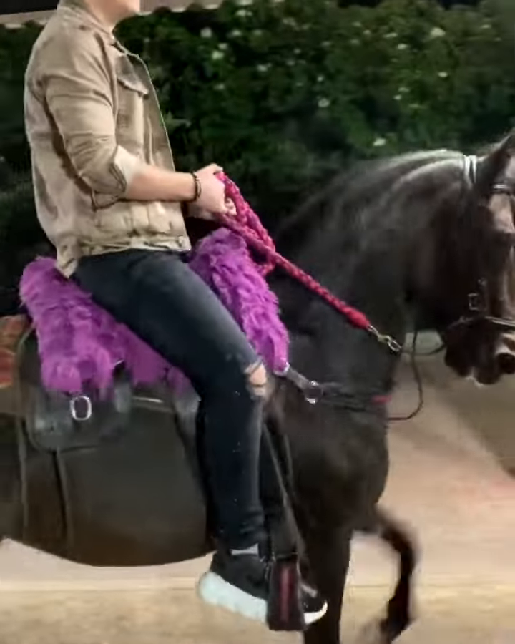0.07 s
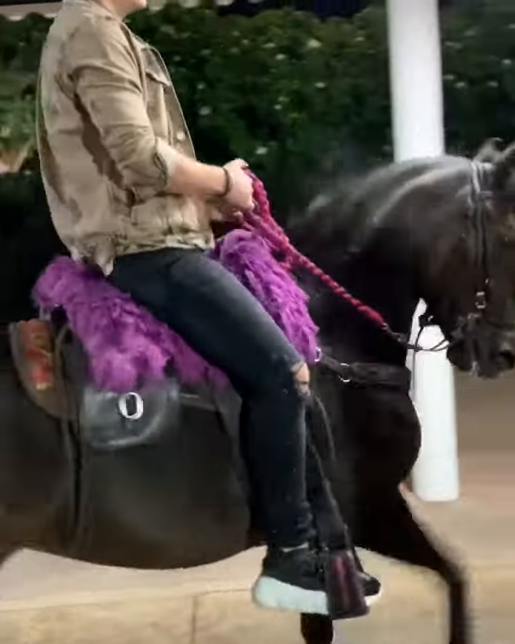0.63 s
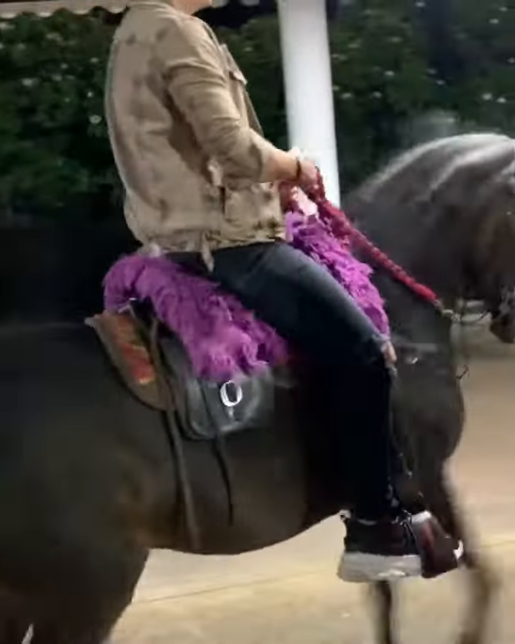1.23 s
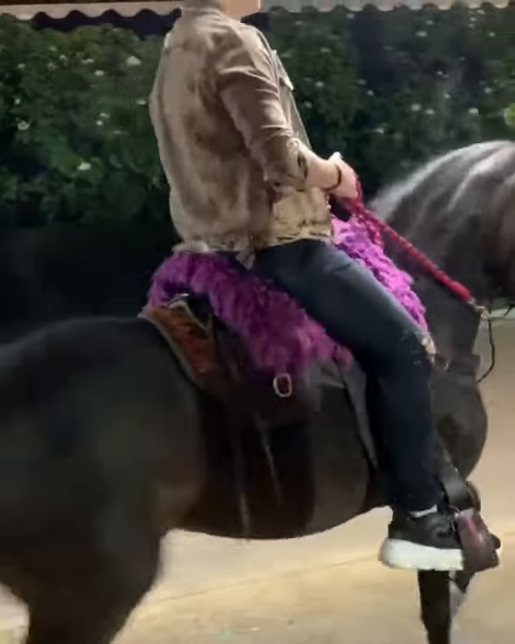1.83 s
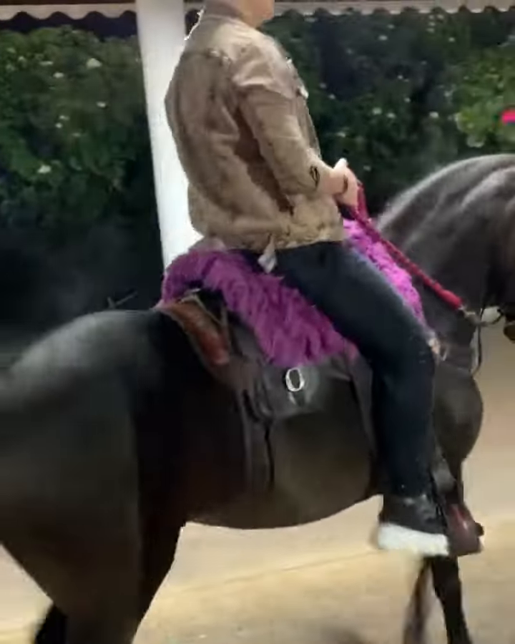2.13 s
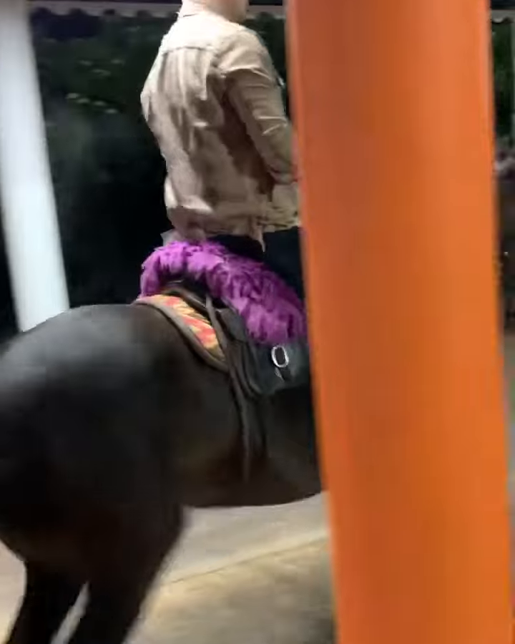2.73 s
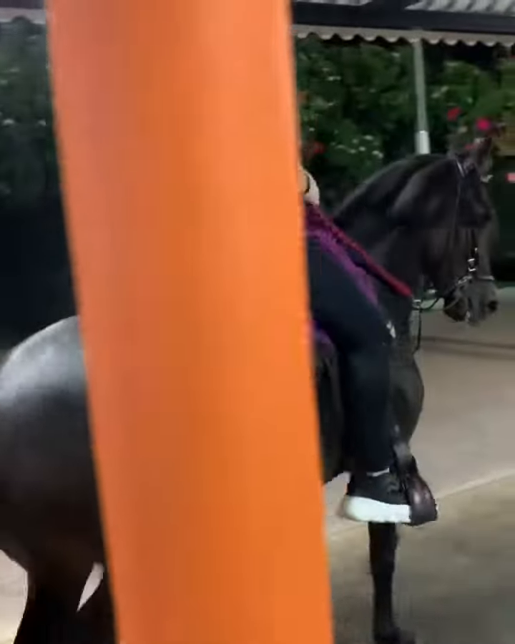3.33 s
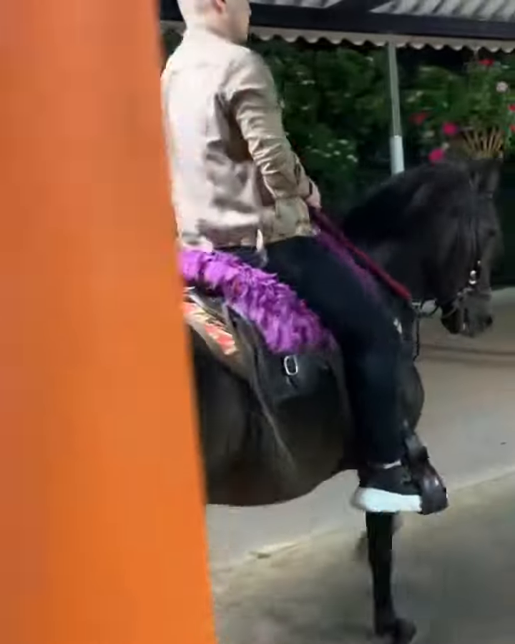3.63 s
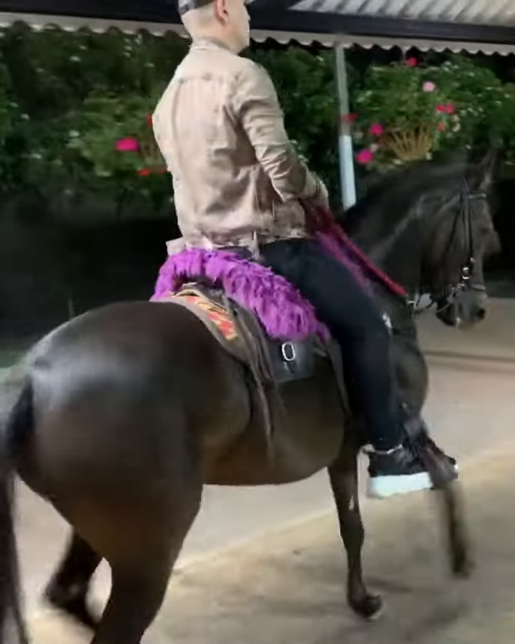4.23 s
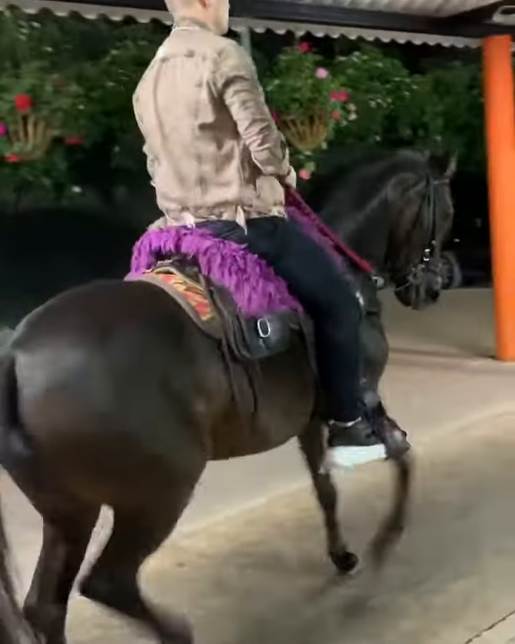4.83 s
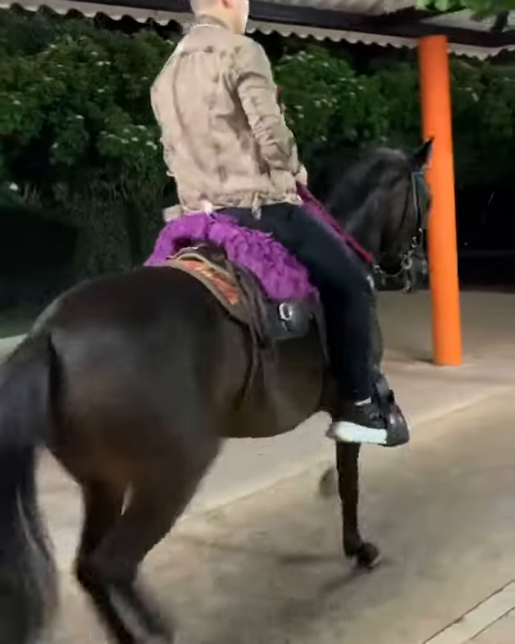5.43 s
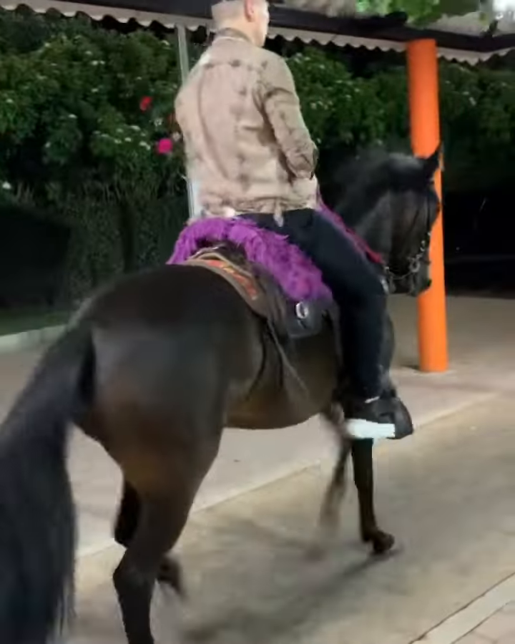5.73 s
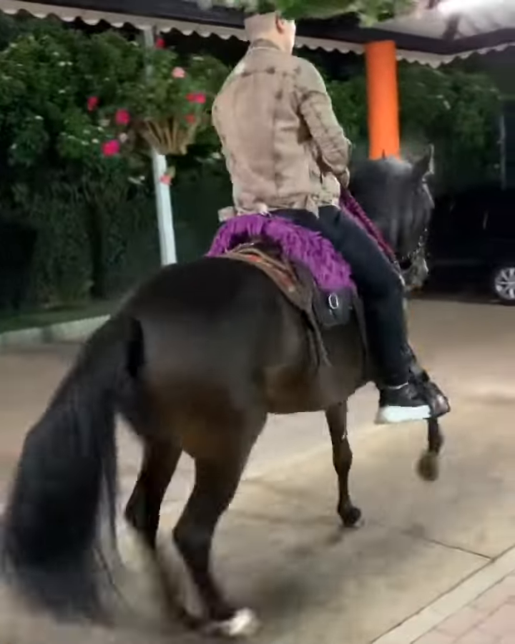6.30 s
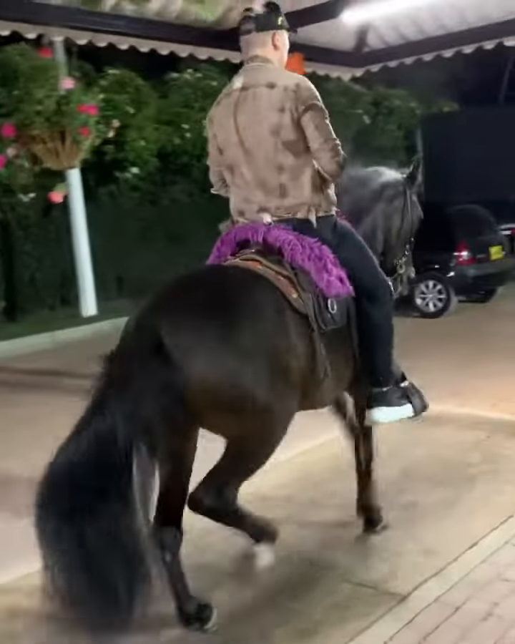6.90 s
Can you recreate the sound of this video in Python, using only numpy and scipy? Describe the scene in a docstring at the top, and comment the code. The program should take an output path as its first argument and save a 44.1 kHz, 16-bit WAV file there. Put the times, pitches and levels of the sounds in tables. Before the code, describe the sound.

Quick, even hoofbeats of a horse clop and clink on stone close by, with faint low night ambience behind.

```python
"""A paved place under a roof, at night: a horse walks past a close-set stereo microphone in quick short steps.
Fore hooves land flat, hind hooves heel then toe: a tick and click of steel on stone, a hollow clop,
then a thud as the weight comes down. Shoes clink, grit and stone chips crunch, one hoof scrapes,
and the roof answers. Behind it all lie a low rumble, a swelling drone and faint night air."""
import sys
import numpy as np
from scipy import signal
from scipy.fft import rfft, irfft, next_fast_len
from scipy.io import wavfile
from scipy.ndimage import map_coordinates

SR = 44100
rng = np.random.default_rng(int(sys.argv[2]) if len(sys.argv) > 2 else 0)


def wrap_up_sound(samples):
    """Save the sound to the file named by the first command line argument, as 16-bit audio."""
    columns = np.atleast_2d(samples).T
    # keep every value between -1 and 1, then stretch to whole-number steps
    tamed = np.clip(columns, -1, 1)
    steps = np.round(tamed * 32767).astype(np.int16)
    wavfile.write(sys.argv[1], SR, steps)


N = 306936
TIME = np.arange(N) / SR

# Spectra of a hoof on paving, brightest part first: f/Hz, level/dB
TICK_SPECTRUM = [(3500, 6.5), (5100, 8), (6500, 0), (8200, 0), (9800, -5), (11200, -11), (12200, -45)]
CLICK_SPECTRUM = [(1200, 25), (2000, 7), (2600, 12.5), (4100, 1.5), (4900, 4.5), (7000, 7)]
CLOP_SPECTRUM = [(250, -13), (480, -3.5), (650, 6), (1000, -3.5), (1400, -2), (2100, -2.5), (3200, -92)]
THUD_SPECTRUM = [(60, -15), (110, 3.5), (160, 0.5), (330, -2.5), (420, -1.5), (520, -11), (900, -5)]
WEIGHT_SPECTRUM = [(45, -14.5), (80, -12.5), (115, 0.5), (170, 5), (240, -9), (350, -2.5), (520, -59)]
def hooves():
    """All steps, as a sharp part (shoe and horn on stone) and a dull part (weight on the ground)."""
    every_contact = np.hstack([fore_contacts(), hind_contacts(), clink_contacts()])
    s, contact_s, thud_db, thud_hz, clop_db, hollow_db, clop_hz, click_db, shoe_hz, tick_db = every_contact
    tick_db = tick_db + 1.2 * rng.standard_normal(len(s)) + 2.5
    steel_db = click_db - 1.5
    tick = strikes(s, tick_db, TICK_SPECTRUM, contact_s, rough=2.35, lag_cycles=.056)
    click = strikes(s, steel_db, CLICK_SPECTRUM, contact_s, rough=.8, lag_cycles=.3773,
                    ring_hz=shoe_hz, q=.88)
    # the steel shoe and the cupped sole ring for a few milliseconds before the hoof damps them
    shoe = strikes(s, steel_db, CLICK_SPECTRUM, contact_s, rough=.8, lag_cycles=.404,
                   ring_hz=shoe_hz, q=11)
    hollow = strikes(s, hollow_db, CLOP_SPECTRUM, contact_s, rough=.45, lag_cycles=1.4,
                     ring_hz=clop_hz, q=7.9)
    clop = strikes(s, clop_db, CLOP_SPECTRUM, contact_s, rough=1, lag_cycles=.7043,
                   ring_hz=clop_hz, q=1.75)
    # one clean low knock, then the body's weight settles, varying less from step to step
    thud = strikes(s, thud_db - 2, THUD_SPECTRUM, crush_s=.015, rough=.4, lag_cycles=1.35,
                   ring_hz=thud_hz, q=2.44, size=4096)
    weight_db = .62 * thud_db - 7
    weight = strikes(s, weight_db, WEIGHT_SPECTRUM, crush_s=.032, rough=4.1, lag_cycles=.8056, size=6144)
    return tick + click + shoe + clop + hollow, thud + weight


# Fore footfalls: t/s, thud level/dB, thud f/Hz, clop level/dB, hollow ring level/dB, clop f/Hz,
# click level/dB, shoe f/Hz
FORE_FOOTFALLS = [(0.0633, -6.5, 185, -18.5, -27, 785, -27.5, 2340),
                  (0.238, -13.5, 227, -15.5, -18, 900, -21.5, 3350),
                  (0.4400, -5.5, 253, -10.5, -22, 875, -20.5, 2330),
                  (0.5999, -4, 288, -19, -32, 1050, -18, 3740),
                  (0.7697, -6.5, 218, -22, -24, 1220, -21, 3760),
                  (0.9488, -10, 203, -10.5, -8, 810, -15, 2660),
                  (1.111, -3, 206, -21, -31, 1280, -24.5, 2290),
                  (1.1426, -15, 220, -14, -26, 1160, -19, 2780),
                  (1.31, -13.5, 328, -13, -30, 1000, -24, 2710),
                  (1.4925, -9.5, 212, -13, -26, 1470, -22.5, 2360),
                  (1.6573, -15, 340, -11.5, -19, 960, -25, 2380),
                  (1.8384, -5, 326, -14, -28, 895, -26, 2700),
                  (1.868, -8, 187, -12.5, -13, 970, -18.5, 3450),
                  (2.0162, -16, 237, -15, -30, 1180, -21.5, 2320),
                  (2.204, -6.5, 305, -17.5, -16.5, 1100, -22.5, 3480),
                  (2.3619, -10.5, 214, -30, -21, 1030, -23, 3460),
                  (2.5888, -6, 217, -11.5, -23, 1030, -24.5, 3900),
                  (2.7435, -11, 214, -21, -30, 1120, -25, 3530),
                  (2.9291, -4.5, 189, -18.5, -21.5, 1140, -25, 3000),
                  (3.108, -9.5, 174, -23, -23.5, 905, -26.5, 3900),
                  (3.2925, -3, 243, -33, -19.5, 1010, -24.5, 3140),
                  (3.4638, -6.5, 290, -11, -19, 756, -24, 2120),
                  (3.652, -15, 205, -31, -37, 1202, -49, 4170),
                  (3.825, -5, 148, -20.5, -28, 1080, -28, 2720),
                  (4.014, -2.5, 182, -14, -27, 850, -20.5, 3400),
                  (4.1838, -9.5, 166, -14, -17, 1180, -26.5, 2630),
                  (4.354, -6, 347, -9, -18, 800, -21.5, 3570),
                  (4.532, -2, 187, -17.5, -41, 1360, -18.5, 2460),
                  (4.7183, -11.5, 200, -14.5, -33, 1270, -18.5, 2520),
                  (4.8906, -8.5, 167, -13.5, -30, 1300, -27, 3720),
                  (5.078, -19.5, 207, -25, -21, 720, -37, 3640),
                  (5.2493, -13, 268, -36, -35, 1550, -23, 2770),
                  (5.431, -7, 184, -11, -18, 875, -20.5, 2500),
                  (5.599, -6.5, 177, -14.5, -36, 1130, -28.5, 2750),
                  (5.7987, -5.5, 169, -15, -18.5, 810, -23.5, 2330),
                  (5.9539, -3.5, 186, -11.5, -19.5, 800, -20.5, 3430),
                  (6.132, -4.5, 213, -12.5, -19, 910, -20.5, 2600),
                  (6.303, -7, 247, -25, -19.5, 895, -20, 4060),
                  (6.475, -7.5, 159, -17, -21, 1165, -30, 2650),
                  (6.637, -7, 174, -11, -33, 1210, -20, 2800), (6.8442, -4, 170, -11, -18, 734, -24, 2460)]
def fore_contacts():
    """Each fore hoof lands flat and heavy, in one hard blow."""
    s, thud_db, thud_hz, clop_db, hollow_db, clop_hz, click_db, shoe_hz = np.transpose(FORE_FOOTFALLS)
    contact_s = .001
    return contacts(s, contact_s, thud_db, thud_hz, clop_db, hollow_db, clop_hz, click_db, shoe_hz,
                    tick_db=click_db - 4.5)


# Hind footfalls, between the fore ones: toe t/s, heel-to-toe roll/s, heel level/dB, thud level/dB,
# clop level/dB, clop f/Hz, click level/dB, shoe f/Hz
HIND_FOOTFALLS = [(0.2127, 0.024, -23.5, -11, -17, 850, -27, 2430),
                  (0.359, 0.0095, -21.5, -9.5, -20, 776, -20.5, 3170),
                  (0.55, 0.016, -18.5, -10, -18.5, 1400, -22, 2390),
                  (0.7143, 0.011, -18.5, -11, -24, 1141, -20.5, 2220),
                  (0.888, 0.01, -17, -13, -18.5, 920, -23, 4040),
                  (1.057, 0.011, -20, -13.5, -27, 960, -19.5, 3500),
                  (1.2514, 0.017, -17, -11, -30, 1370, -22, 2490),
                  (1.4116, 0.013, -19, -14.5, -26, 900, -19, 2420),
                  (1.615, 0.02, -20, -10.5, -25, 1380, -24, 2540),
                  (1.7767, 0.016, -21, -13.5, -25, 1250, -20.5, 2350),
                  (1.939, 0.011, -27, -17.5, -22.5, 1350, -27, 2520),
                  (2.121, 0.003, -22, -10, -41, 935, -21, 4170),
                  (2.3166, 0.019, -20, -12, -16.5, 700, -26.5, 3860),
                  (2.4949, 0.0063, -21.5, -12, -21.5, 770, -21.5, 4070),
                  (2.6927, 0.023, -23, -9.5, -15.5, 886, -37, 2290),
                  (2.8769, 0.013, -22.5, -19, -24, 730, -30, 3040),
                  (3.0533, 0.015, -23.5, -16.5, -20, 866, -28, 4160),
                  (3.234, 0.0092, -21, -18, -26, 1150, -22.5, 3350),
                  (3.42, 0.015, -18.5, -18, -26, 987, -26, 2390),
                  (3.588, 0.012, -28, -14.5, -20, 1420, -20, 3900),
                  (3.766, 0.015, -19.5, -13, -21, 1010, -21, 2750),
                  (3.9426, 0.011, -17.5, -12.5, -47, 1450, -23.5, 2470),
                  (4.131, 0.016, -15.5, -19, -15.5, 714, -30.5, 3330),
                  (4.302, 0.0089, -20, -15.5, -20, 1510, -21, 3700),
                  (4.4832, 0.013, -19, -10, -20.5, 1372, -23, 2400),
                  (4.65, 0.0071, -37, -14, -20.5, 1610, -20, 3130),
                  (4.8354, 0.012, -19.5, -13, -25.5, 1280, -27, 3870),
                  (5.019, 0.0038, -48, -16, -22.5, 1600, -19, 2900),
                  (5.2044, 0.016, -19.5, -10.5, -21, 1340, -22.5, 2660),
                  (5.372, 0.0035, -28, -13.5, -18.5, 1460, -20.5, 2620),
                  (5.5586, 0.013, -20, -18.5, -21.5, 1010, -24.5, 3040),
                  (5.7233, 0.014, -24, -12, -21.5, 1600, -23.5, 2500),
                  (5.8852, 0.0012, -39, -9.5, -13, 1440, -27.5, 2550),
                  (6.0651, 0.015, -24, -14, -11.5, 820, -25.5, 4160),
                  (6.241, 0.0065, -23, -13.5, -14, 943, -29, 3560),
                  (6.404, 0.009, -22, -15.5, -16, 744, -23, 4000),
                  (6.5973, 0.015, -25, -7.5, -23, 1075, -25, 2300),
                  (6.7661, 0.0043, -29, -14, -22, 1530, -20, 3200),
                  (6.9454, 0.0026, -44, -15, -22, 940, -33.5, 2320)]
def hind_contacts():
    """Each hind hoof knocks dully with its heel, then snaps down on its toe."""
    s, roll_s, heel_db, thud_db, clop_db, clop_hz, click_db, shoe_hz = np.transpose(HIND_FOOTFALLS)
    heel = contacts(s - roll_s, contact_s=.0013, thud_db=thud_db - .5, thud_hz=light_thud_hz(s),
                    clop_db=heel_db, hollow_db=heel_db - 6,
                    clop_hz=825 * np.exp(.23 * rng.standard_normal(len(s))),
                    click_db=heel_db - 15, shoe_hz=shoe_hz, tick_db=heel_db - 14.5)
    toe = contacts(s, contact_s=.0013, thud_db=thud_db - .5, thud_hz=light_thud_hz(s),
                   clop_db=clop_db - 1, hollow_db=clop_db - 6, clop_hz=clop_hz,
                   click_db=click_db, shoe_hz=shoe_hz, tick_db=click_db - 1.5)
    return np.hstack([heel, toe])


LIGHT_CONTACT_S = .0011  # clinks and stone chips
# A shoe clinks as the hoof settles or leaves the ground: t/s, level/dB, ring f/Hz
SHOE_CLINKS = [(0.2447, -27.5, 2938), (0.462, -24.5, 3100), (0.6308, -28, 2820), (0.653, -22.5, 3230),
               (0.811, -20, 3370), (0.954, -23.5, 3700), (1.148, -19.5, 3300), (1.3, -24, 2880),
               (1.692, -17, 3570), (1.8791, -19.5, 4300), (1.902, -37, 2580), (2.217, -26, 2560),
               (2.6097, -21.5, 2620), (2.773, -18, 3000), (2.958, -21.5, 2550), (3.3292, -20, 3080),
               (3.491, -26, 3200), (3.8536, -22, 2480), (4.0534, -18.5, 2780), (4.194, -22.5, 3350),
               (4.4025, -25.5, 4500), (4.565, -20.5, 3650), (4.9038, -24.5, 3600), (5.093, -26, 3860),
               (5.26, -23, 3420), (5.2724, -19.5, 2530), (5.4605, -21, 3950), (5.811, -23, 4000),
               (5.894, -26.5, 2380), (5.982, -20.5, 2180), (6.156, -20.5, 3160), (6.3153, -18, 4240),
               (6.8642, -21, 2420)]
def clink_contacts():
    """A clink is steel striking stone, with a dull knock of about the same strength behind it."""
    s, db, hz = np.transpose(SHOE_CLINKS)
    return contacts(s, LIGHT_CONTACT_S, thud_db=db + 1, thud_hz=light_thud_hz(s),
                    clop_db=db - 3, hollow_db=db - 18.5, clop_hz=1180,
                    click_db=db, shoe_hz=hz, tick_db=db - 6.5)


def lifted_shoe_ring():
    """With no weight on it, a clinking shoe rings on for longer."""
    s, db, hz = np.transpose(SHOE_CLINKS)
    return strikes(s, db - 13.5, CLICK_SPECTRUM, LIGHT_CONTACT_S, rough=1, lag_cycles=.402,
                   ring_hz=hz, q=15)


def light_thud_hz(s):
    """No two light thuds have quite the same pitch."""
    return 180 * np.exp(.17 * rng.standard_normal(len(s)))


def contacts(s, contact_s, thud_db, thud_hz, clop_db, hollow_db, clop_hz, click_db, shoe_hz, tick_db):
    """Gather the properties of a set of contacts, one column per contact."""
    return np.array(np.broadcast_arrays(s, contact_s, thud_db, thud_hz, clop_db, hollow_db, clop_hz,
                                        click_db, shoe_hz, tick_db))


def strikes(s, level_db, spectrum, crush_s, rough, lag_cycles, ring_hz=None, q=1, size=2048):
    """One mid/side pulse per contact: a blow and crushing grit, with a damped resonance at ring_hz."""
    lead, rise_s = 512, .0023  # grit starts to give just before a shoe is fully down
    t = (np.arange(size) - lead) / SR
    hz = np.fft.rfftfreq(size, 1 / SR) + 1
    decay_s = np.maximum(crush_s * np.ones(len(s)), 1e-4)[:, None]
    crush = np.exp(np.minimum(t / rise_s, -t / decay_s))
    force = rough * rng.standard_normal((2, *crush.shape)) * crush
    force /= np.linalg.norm(crush, axis=1, keepdims=True)
    force[0, :, lead] += 1  # the blow itself reaches both microphone ports alike
    # low notes take longer to build up, so every pulse sweeps downward
    response = colour(spectrum, hz) * np.exp(-2j * np.pi * lag_cycles * np.log(hz))
    if ring_hz is not None:
        detuning = hz / ring_hz[:, None] - ring_hz[:, None] / hz
        response = response / (1 + 1j * q * detuning)
    pulses = irfft(rfft(force) * response)
    # a level is the rms that the pulse would have if packed into 5 ms
    pulses *= amp(level_db)[:, None] * np.sqrt(.005 * SR) / np.linalg.norm(pulses, axis=2, keepdims=True)
    where = (np.round(s[:, None] * SR).astype(int) + np.arange(size)).ravel()
    return np.array([np.bincount(where, p.ravel(), N + size)[lead:N + lead] for p in pulses])


# Hooves sliding on sand: middle t/s, half length/s, crunch level/dB, sand level/dB
SLIDES = [(0.0, 0.016, -26.5, -30), (0.235, 0.53, -39.5, -52), (0.645, 0.023, -27.5, -39.5),
          (0.738, 0.042, -54, -45.5), (0.805, 0.025, -31, -55), (1.167, 0.063, -31.5, -49),
          (1.252, 0.0093, -31, -56), (1.722, 0.02, -33, -39), (1.852, 0.071, -31, -49.5),
          (1.916, 0.071, -29, -51), (2.692, 0.036, -40, -43.5), (2.892, 0.02, -51, -41),
          (3.107, 0.091, -36.5, -50), (3.474, 0.14, -36, -48.5), (4.062, 0.026, -45, -43),
          (4.14, 0.011, -44, -49), (4.331, 0.008, -40, -37.5), (4.389, 0.04, -27.5, -51),
          (5.603, 0.09, -35.5, -67), (5.987, 0.037, -34.5, -44), (6.248, 0.019, -26, -40)]
def grit(sharp, settle_s, crunch_db, sand_db):
    """Sand goes on crunching under the hoof while it takes the load, and more when it slides."""
    t = np.arange(SR // 4) / SR
    load = t * np.exp(-t / settle_s)
    pressure = np.sqrt(np.abs(signal.fftconvolve(sharp ** 2, load / load.sum())[:N]))
    crunch, sand = amp(crunch_db) * pressure, amp(sand_db) * pressure
    for s, half_s, slide_crunch_db, slide_sand_db in SLIDES:
        slide = np.exp(-((TIME - s) / half_s) ** 2)
        crunch = np.hypot(crunch, amp(slide_crunch_db + 5) * slide)
        sand = np.hypot(sand, amp(slide_sand_db + 9.5) * slide)
    return crunch * rush(AIR_SPECTRUM, grain_db=5.5) + sand * rush(HISS_SPECTRUM, grain_db=4)


# Spectrum of chips under a sliding hoof: f/Hz, level/dB
GRAVEL_SPECTRUM = [(1500, -6), (2500, 7.5), (4300, -7), (6000, -2)]
def gravel(per_slide=12):
    """A sliding hoof cracks chips one after another, at uneven moments."""
    s, half_s, crunch_db, _ = np.repeat(SLIDES, per_slide, axis=0).T
    when, strength, pitch = rng.standard_normal((len(s), 3)).T
    moments = np.abs(s + .5 * half_s * when)
    return strikes(moments, crunch_db - 4.5 + 2 * strength, GRAVEL_SPECTRUM, LIGHT_CONTACT_S,
                   rough=1, lag_cycles=.503, ring_hz=3250 * np.exp(.22 * pitch), q=3)


def chips(per_step=3, delay_s=.024):
    """A few stone chips give way under each loaded hoof, each with a brief note of its own."""
    steps = np.repeat([row[0] for row in FORE_FOOTFALLS + HIND_FOOTFALLS], per_step)
    wait, strength, pitch = rng.standard_normal((len(steps), 3)).T
    moments = steps + delay_s * np.exp(.5 * wait)
    return strikes(moments, -39 + 1.5 * strength, CLICK_SPECTRUM, LIGHT_CONTACT_S,
                   rough=.87, lag_cycles=.483, ring_hz=3040 * np.exp(.25 * pitch), q=3)


# Hard grains cracking: t/s, decay/s, level/dB, f/Hz
GRAIN_CRACKS = [(0.888, .001, -15.5, 4700), (1.057, .001, -15, 6200), (1.314, .001, -36, 3400),
                (1.413, .001, -24.5, 7800), (1.147, 0.00092, -20, 4200), (2.123, 0.00071, -19, 5600),
                (2.774, 0.00054, -16.5, 7140), (3.4636, .001, -28.5, 3300), (3.944, .001, -18, 4500),
                (4.017, .001, -29, 4200), (4.198, 0.0005, -18.5, 7200), (4.401, .0004, -34, 8900),
                (4.532, .0005, -24.5, 9050), (4.568, .0006, -22, 8800), (4.892, 0.00091, -16, 3730),
                (5.261, .0008, -22, 6200), (6.24, 0.0042, -19.5, 10600), (6.3146, .001, -20, 5560),
                (6.637, 0.0011, -23.5, 6340)]
# Spectrum of one crack: f/Hz, level/dB
CRACK_SPECTRUM = [(2500, 2), (7000, 0.5), (10800, -5), (12000, -25)]
def sand_cracks():
    """Now and then a single grain bursts between shoe and stone with a hard, bright snap."""
    s, decay_s, db, hz = np.transpose(GRAIN_CRACKS)
    return strikes(s, db, CRACK_SPECTRUM, decay_s, rough=.55, lag_cycles=.062, ring_hz=hz, q=3)


# One hoof dragged over the paving: t/s, f/Hz, level/dB
HOOF_DRAG = [(5.53, 1095, -47), (5.56, 1044, -34), (5.61, 975, -27), (5.66, 904, -27), (5.69, 805, -26),
             (5.73, 752, -43)]
def scrape(width_hz):
    """A dragged hoof rasps in a narrow band that sinks as it slows."""
    hz, db = curves(HOOF_DRAG)
    rasp = wobble(width_hz) + 1j * wobble(width_hz)
    band = rasp * np.exp(2j * np.pi * np.cumsum(hz) / SR)
    dragging = (TIME > HOOF_DRAG[0][0]) & (TIME < HOOF_DRAG[-1][0])
    return amp(db) * unit(band.real) * dragging


# Reverberation under the roof: f/Hz, time to fall 60 dB/s
ROOF_DECAY = [(100, 0.13), (400, 0.2), (1200, 0.19), (4000, 0.14), (9800, 0.2), (11000, 0.0093)]
# How far single notes stand out of it: f/Hz, level spread/dB
ROOF_NOTES = [(150, 0.5), (350, 5), (1700, 2.5), (2800, 2), (9000, 3.5)]
def roof(steps, build_s):
    """Roof and paving answer with a short tail, different at each place along the horse's way."""
    echoes = np.zeros((2, N))
    passing_s = np.linspace(0, TIME[-1], num=24)
    for s in passing_s:
        hz, t, noise = signal.stft(rng.standard_normal((2, SR // 2)), SR, nperseg=256)
        build = 1 - np.exp(-t / build_s)  # the answer takes a moment to arrive
        fade = amp(-60 * t / along(ROOF_DECAY, hz)[:, None])
        notes = amp(along(ROOF_NOTES, hz) * rng.standard_normal(len(hz)))[:, None]
        tail = signal.istft(noise * build * fade * notes, SR, nperseg=256)[1]
        tail /= np.linalg.norm(tail[0])
        share = np.maximum(1 - np.abs(TIME - s) / passing_s[1], 0)  # crossfade between places
        near = np.flatnonzero(share)
        echo = signal.fftconvolve((steps * share)[None, near], tail, axes=1)[:, :N - near[0]]
        echoes[:, near[0]:near[0] + echo.shape[1]] += echo
    return diffuse(echoes)


# Swells of the drone behind the horse: t/s, level/dB
DRONE_SWELLS = [(0.0, -14), (0.08, -14.5), (0.46, -33), (0.54, -13.5), (0.77, -23), (1.12, -10.5),
                (1.61, -24.5), (1.66, -16.5), (2.23, -26), (2.38, -15), (2.56, -48), (2.6, -22.5),
                (2.83, -21), (2.91, -52), (3.02, -20), (3.39, -35), (3.53, -17), (3.76, -37), (3.82, -14.5),
                (4.19, -23.5), (4.27, -11), (4.94, -38.5), (5.58, -10.5), (5.76, -30), (5.95, -26),
                (6.96, -29)]
def drone():
    """A low tone swells and fades, wavering slightly in pitch and level."""
    db, = curves(DRONE_SWELLS)
    hz = 62.4 + .99 * wobble(7)
    tone = unit(np.sin(2 * np.pi * np.cumsum(hz) / SR))
    return amp(db - 1.1 + wobble(23.04)) * tone


# Spectra of the ambience (air and hiss also colour the grit): f/Hz, level/dB
RUMBLE_SPECTRUM = [(15, -16), (28, -13), (42, 1.5), (52, 1.5), (75, -34), (150, -100)]
LOW_AIR_SPECTRUM = [(40, -28), (75, 10), (110, 3), (170, -12.5), (320, -24), (420, -23), (600, -60),
                    (1500, -55)]
AIR_SPECTRUM = [(250, 9), (520, 3.5), (750, 0), (1500, -2.5), (2200, -3), (3200, -37), (6000, -61)]
HISS_SPECTRUM = [(1500, 21), (2800, 4.5), (4100, 22.5), (5200, -1), (6300, 17), (8300, 12.5), (9900, 7),
                 (10500, 0), (11200, -5.5)]
def night_air():
    """Low rumble and faint air all around the microphone, each layer rising and falling on its own."""
    swell = lambda db: amp(db + 4 * wobble(4))
    rumble = swell(-26) * rush(RUMBLE_SPECTRUM)
    low_air = swell(-26) * rush(LOW_AIR_SPECTRUM)
    air = swell(-37.5) * rush(AIR_SPECTRUM, grain_db=1.5)
    hiss = swell(-49.5) * rush(HISS_SPECTRUM, grain_db=3)
    return rumble + low_air + air + hiss


# Phase between the microphone's ports: f/Hz, lead of the left/rad
LEFT_LEAD = [(100, 0), (450, .03), (700, .4), (1200, .2), (1850, .1), (2350, -1.7), (2700, -.8),
             (3100, -2.1), (3500, -.1), (4150, .5), (4600, 2.2), (5200, 3.1), (6000, 4.7), (7000, 5.5),
             (8300, 6.2), (9700, 6.9), (10600, 8.4), (11400, 9.3)]
# Colour of its side signal: f/Hz, level/dB
SIDE_COLOUR = [(100, -19), (220, -26), (400, -2), (1100, 1), (1430, -5), (1520, 10), (1620, -8), (2050, 1),
               (2500, 3.5), (2850, 5.5), (3100, 1.5), (3900, 5.5), (4400, 0.5), (5000, -0.5), (6200, 0),
               (7500, -9.5), (8800, -25), (10000, 7), (11000, -5), (12000, 18)]
def microphone(sound):
    """The two closely spaced ports differ in phase, and their difference has a colour of its own."""
    left, right = filtered(sound, lambda hz: np.exp(.5j * along(LEFT_LEAD, hz) * np.array([[1], [-1]])))
    mid = (left + right) / 2
    side = filtered((left - right) / 2, lambda hz: amp(along(SIDE_COLOUR, hz)))
    return np.array([mid + side, mid - side])


# Likeness of diffuse sound at the two ports: f/Hz, correlation
PORT_LIKENESS = [(100, .9995), (300, .99), (430, .96), (600, .66), (1300, .78), (2500, .35), (3200, .45),
                 (4000, .7), (5200, .92), (6200, .6), (8500, .76), (11000, .85)]
def diffuse(pair):
    """Two unrelated signals become what the two ports hear of sound from all sides."""
    turn = lambda hz: np.arccos(np.clip(along(PORT_LIKENESS, hz), -1, 1)) / 2
    mid, side = filtered(pair, lambda hz: np.array([np.cos(turn(hz)), np.sin(turn(hz))]))
    return np.array([mid + side, mid - side])


def rush(spectrum, grain_db=0):
    """Stereo noise of rms 1; grain_db breaks it into grains."""
    noise = rng.standard_normal((2, N)) * amp(grain_db * wobble(1500))
    return unit(filtered(diffuse(noise), lambda hz: colour(spectrum, hz)))


def colour(spectrum, hz):
    """Gain of a spectrum, falling 24 dB an octave beyond its two ends."""
    octaves_out = np.abs(np.log2((hz + 1) / np.clip(hz + 1, spectrum[0][0], spectrum[-1][0])))
    return amp(along(spectrum, hz) - 24 * octaves_out)


def amp(db):
    """Decibels to gain."""
    return 10 ** (np.asarray(db) / 20)


def unit(x):
    """Scale to rms 1."""
    return x / np.sqrt(np.mean(x ** 2) + 1e-20)


def along(points, hz):
    """(Hz, value) points read on a log axis."""
    f, v = np.transpose(points)
    return np.interp(np.log(hz + 1), np.log(f + 1), v)


def curves(rows):
    """One value per sample for each column after the time."""
    s, *cols = np.transpose(rows)
    return [np.interp(TIME, s, c) for c in cols]


def wobble(rate):
    """A smooth random curve, rate knots a second."""
    return map_coordinates(rng.standard_normal(int(N * rate / SR) + 4), [TIME * rate])


def filtered(x, response):
    """x times a complex response of frequency."""
    m = next_fast_len(x.shape[-1] + 8192)
    return irfft(rfft(x, m) * response(np.fft.rfftfreq(m, 1 / SR)), m)[..., :x.shape[-1]]


def scene():
    """At the microphone: the horse close by, the roof overhead, drone and night air behind."""
    sharp, dull = hooves()
    stones = sand_cracks() + chips() + gravel()
    near = diffuse(sharp + dull + lifted_shoe_ring() + stones)
    near += scrape(width_hz=290)
    near += grit(sharp[0], settle_s=.0083, crunch_db=-7, sand_db=-21)
    overhead = roof(amp(-9.5) * sharp[0] + amp(-7.5) * dull[0], build_s=.009)
    return microphone(near + overhead + drone() + night_air())


def record(dry):
    """The loudest peaks are rounded off; nothing passes above the band limit."""
    ceiling, top_hz = .9, 12100
    rounded = dry / (1 + np.abs(dry / ceiling) ** 8) ** (1 / 8)
    return filtered(rounded, lambda hz: hz < top_hz)


dry = scene()
out = record(dry)
wrap_up_sound(out)
```